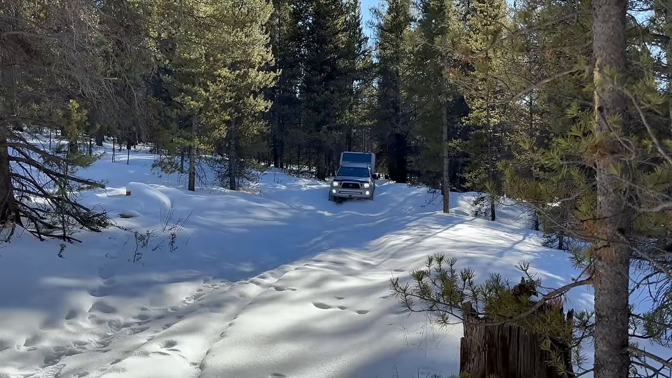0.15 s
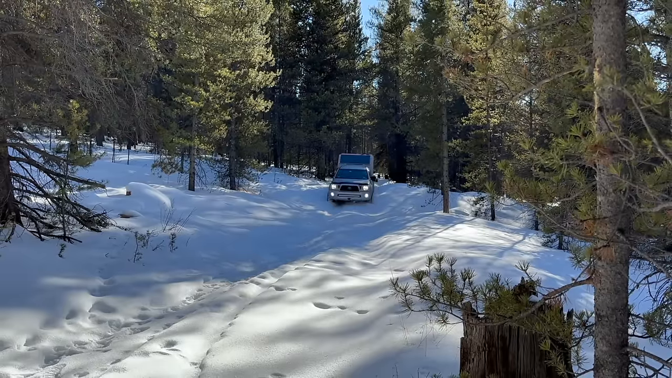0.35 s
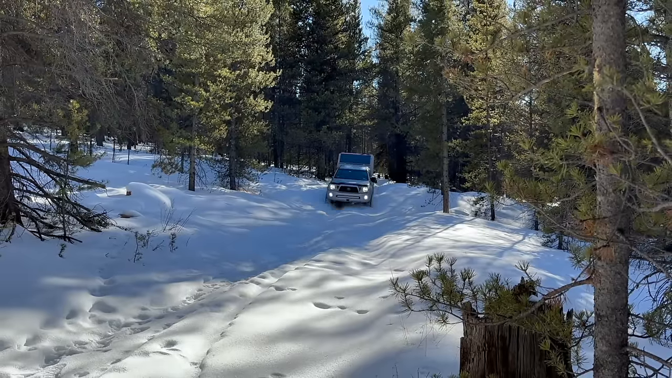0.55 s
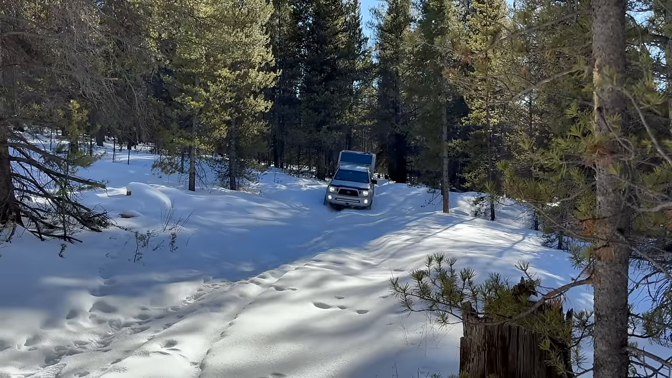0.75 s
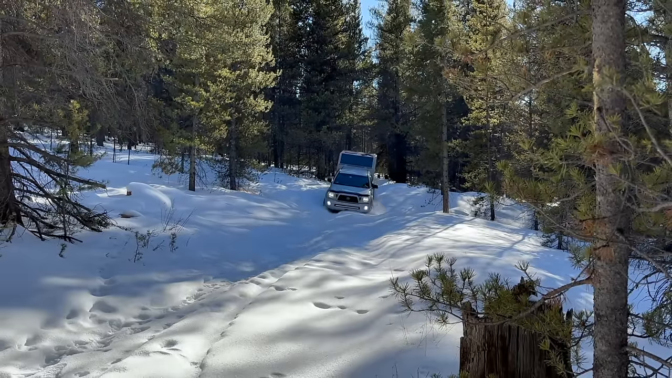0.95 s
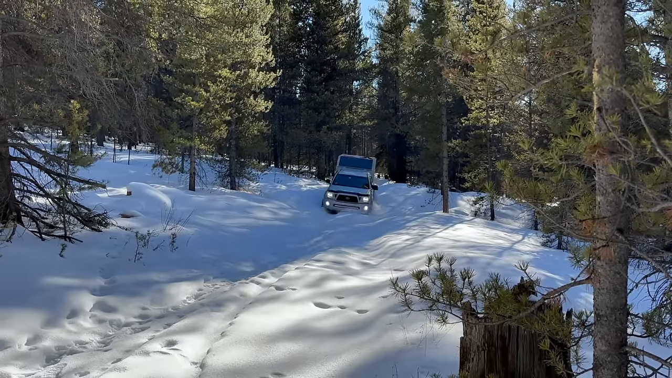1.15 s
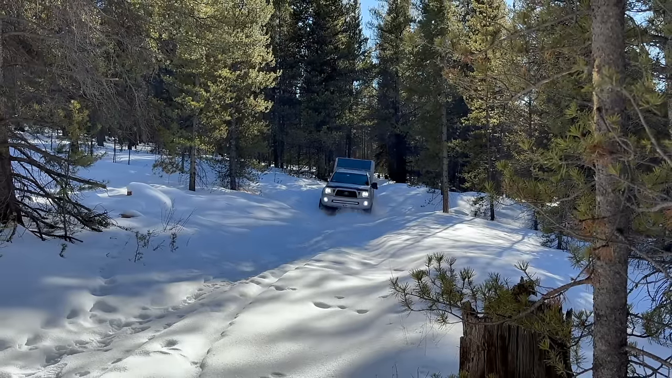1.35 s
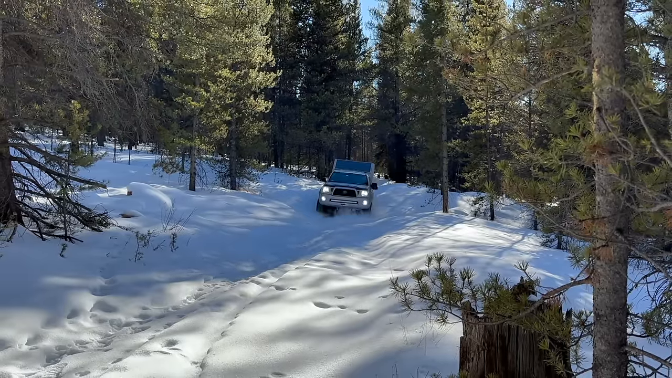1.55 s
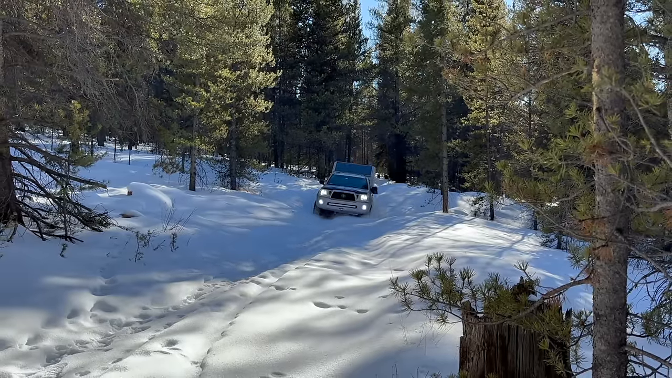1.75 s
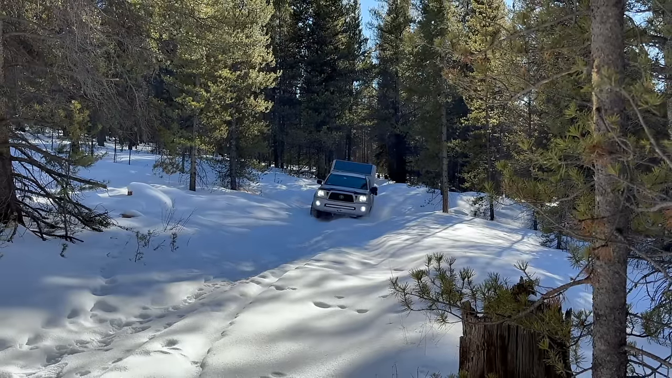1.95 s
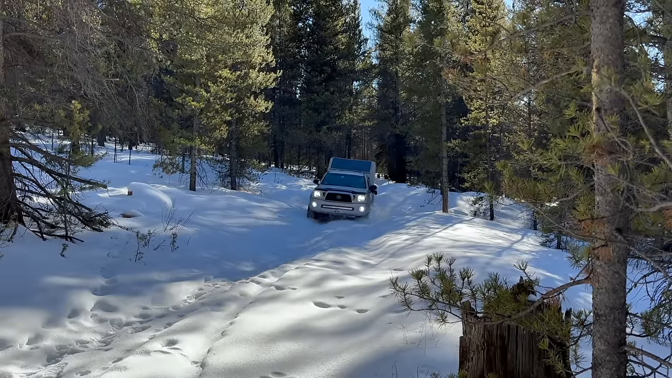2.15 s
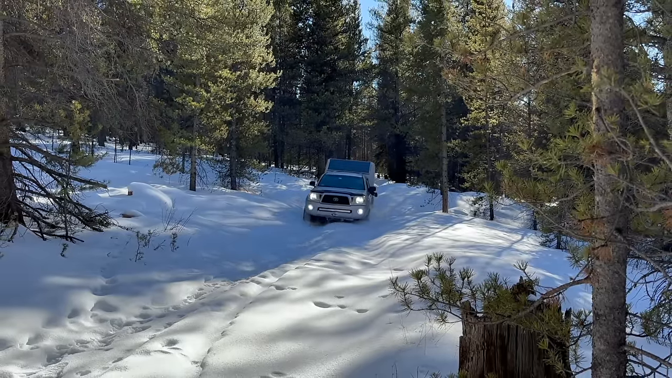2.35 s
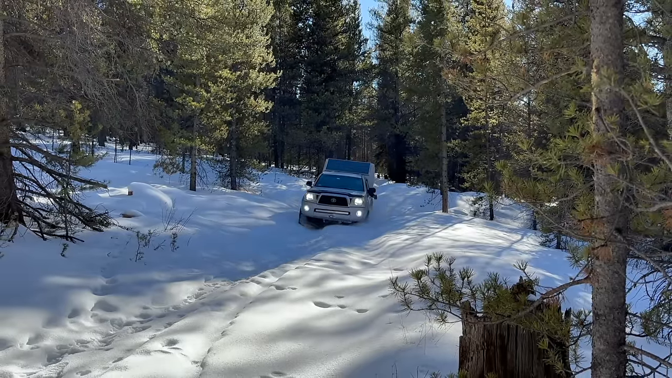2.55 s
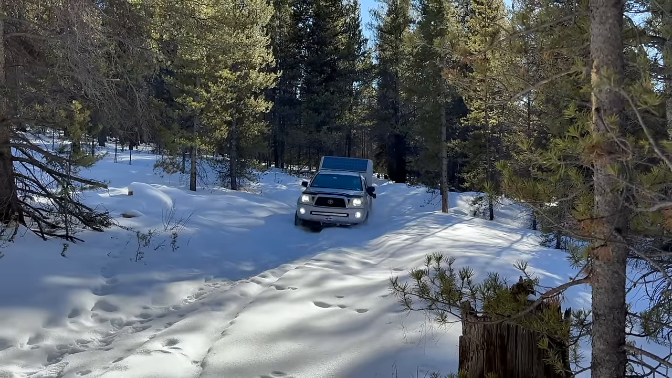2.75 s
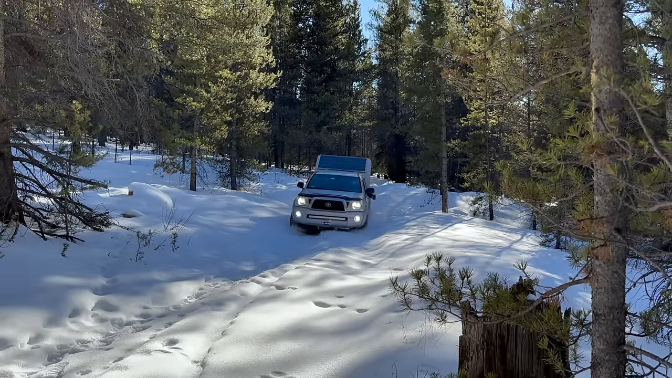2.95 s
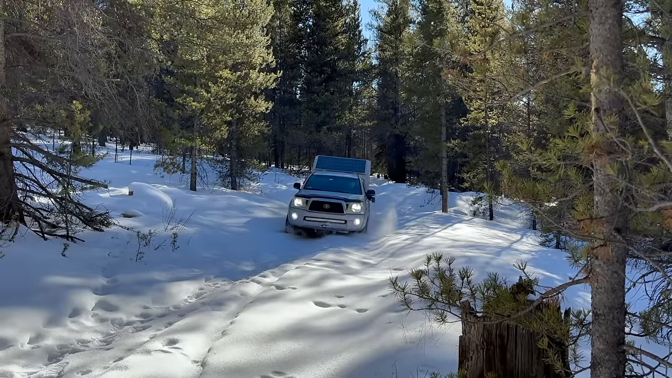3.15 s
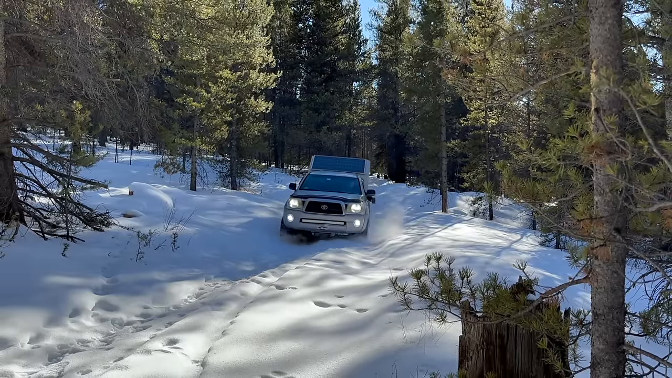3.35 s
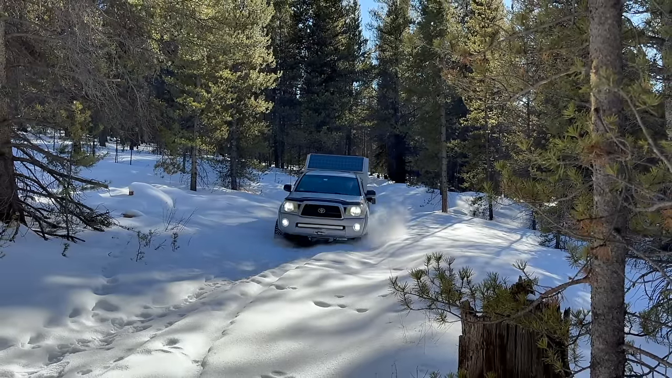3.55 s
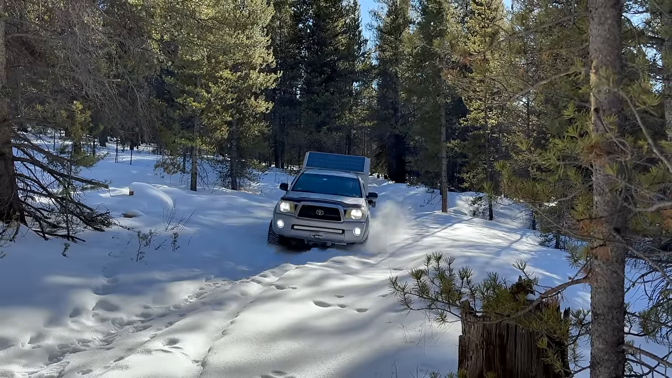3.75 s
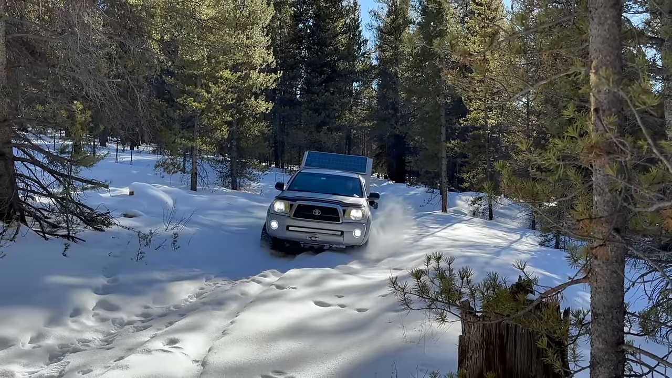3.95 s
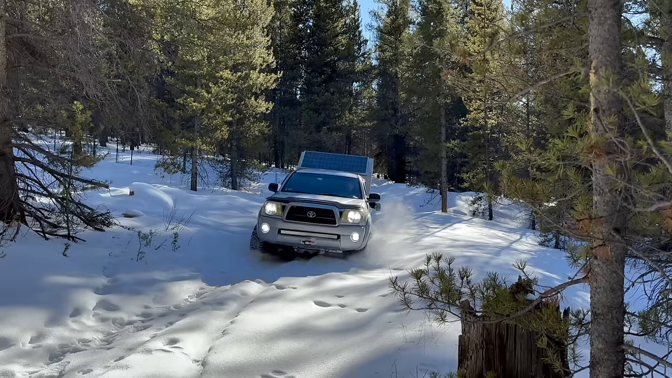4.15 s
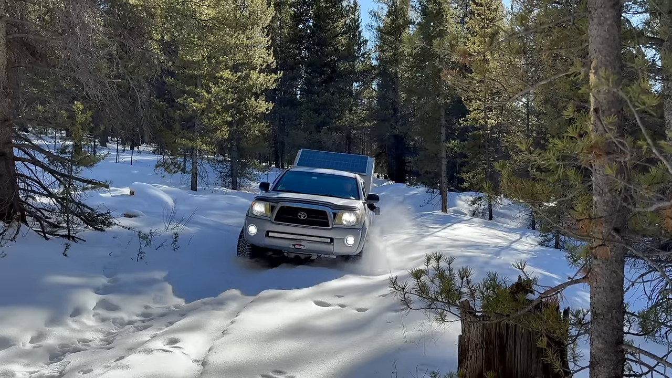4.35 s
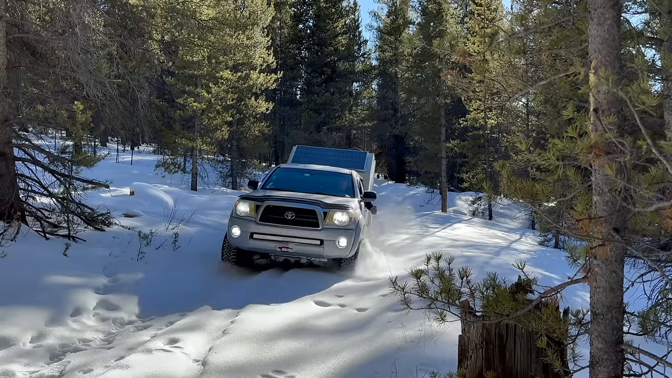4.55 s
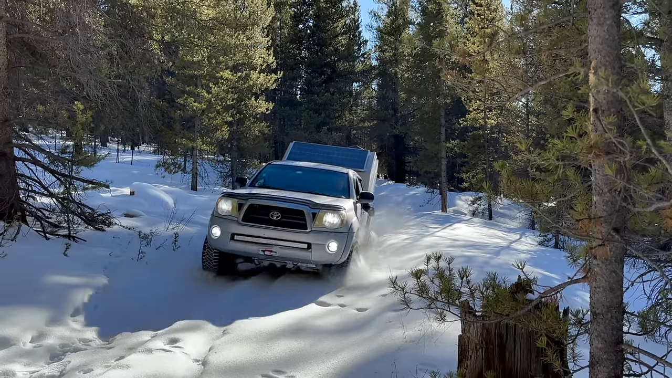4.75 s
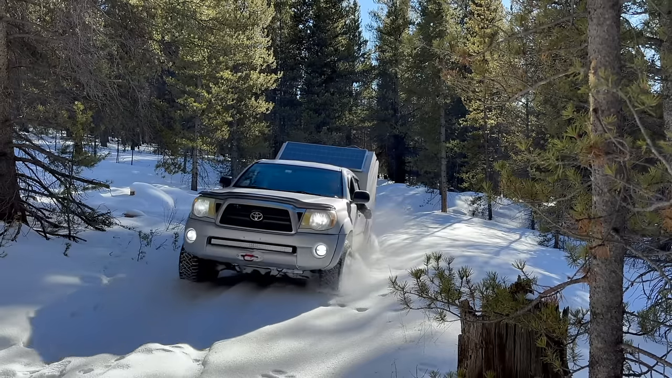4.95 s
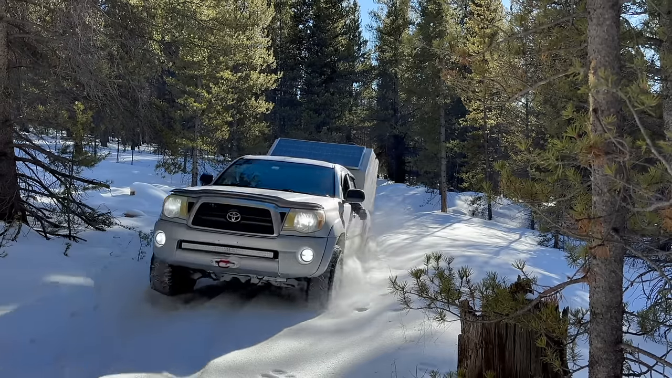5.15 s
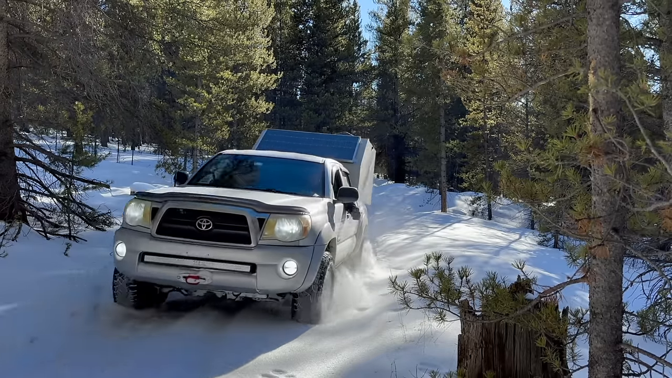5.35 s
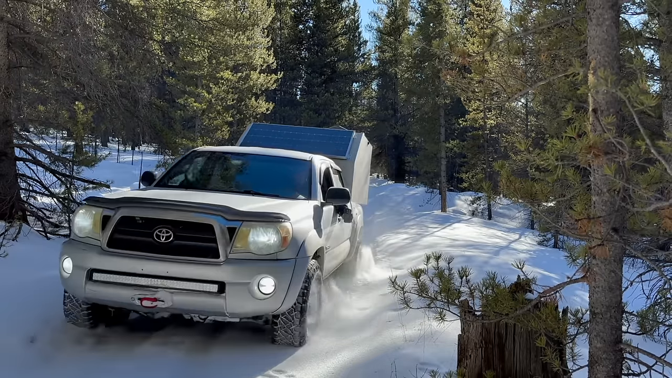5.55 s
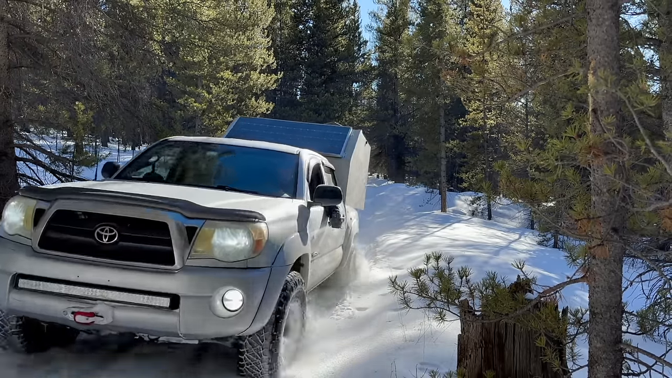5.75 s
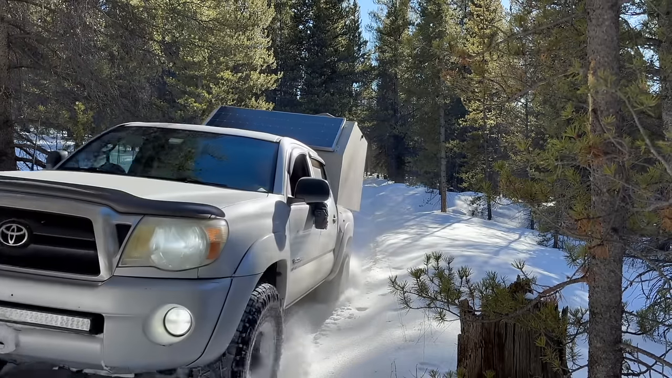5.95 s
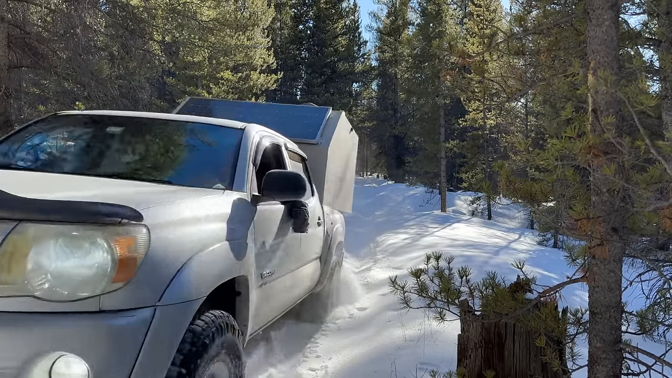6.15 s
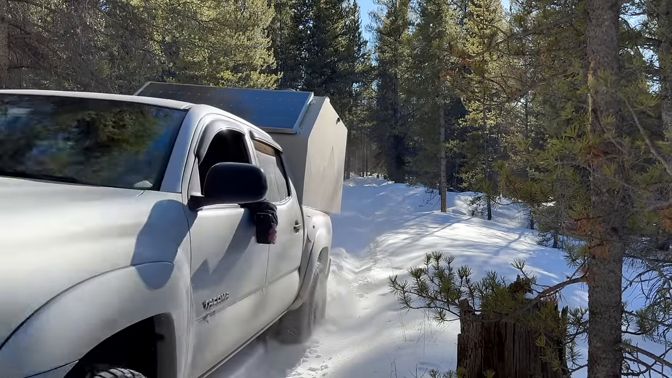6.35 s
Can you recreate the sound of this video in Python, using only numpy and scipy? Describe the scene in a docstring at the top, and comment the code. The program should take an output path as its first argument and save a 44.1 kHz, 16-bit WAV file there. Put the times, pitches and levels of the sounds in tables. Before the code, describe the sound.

Outdoors in a snowy forest, a six-cylinder pickup revs hard in the distance, growl and rushing fan air rising to a peak around one second. The revs drop and steady, ease briefly, then a deeper exhaust drone grows as it nears. Tyres rumble and crunch; snow hisses loudest as it draws level on the left. A fixed stereo microphone stands beside the trail.

```python
"""Pickup climbing a snowy trail

A six-cylinder pickup climbs a forest trail toward the listener and draws level on the left.
Crank-order partials make its growl and exhaust drone; filtered noise makes the rush of fan and intake air.
Banded noise rumbles and packs under the tyres; random snaps crunch and hiss as broken and thrown snow.
The growl and fan lead while it revs far off; closer in, the drone takes over."""
import sys
import numpy as np
from scipy import signal
from scipy.fft import rfft, irfft, next_fast_len
from scipy.io import wavfile

SR = 44100
rng = np.random.default_rng(int(sys.argv[2]) if len(sys.argv) > 2 else 0)


def put_to_file(sound):
    """Save the sound as 16-bit audio at rate SR, in the file named by the first command-line argument."""
    columns = np.atleast_2d(sound).T  # one column per channel
    safe = np.clip(columns, -1, 1)
    whole_steps = np.round(safe * 32767)
    wavfile.write(sys.argv[1], SR, whole_steps.astype(np.int16))


N = 286650
TIME = np.arange(N) / SR

# the truck drives a straight line at a steady pace; each part draws level at: (time [s], distance [m])
TRUCK_M_PER_S = 4.57
ENGINE_PASS, WHEEL_PASS = (6.06, 5.3), (6.384, 3)


def from_db(db):
    """Decibels to gain."""
    return 10 ** (np.asarray(db) / 20)


def rms_one(x):
    """Scale to unit power."""
    return x / np.sqrt(np.mean(x ** 2) + 1e-20)


def in_time(curve):
    """Read a curve of (time, value) points sample by sample."""
    s, value = np.transpose(curve)
    return np.interp(TIME, s, value)


def at_hz(points, hz):
    """Read a spectrum on a log-frequency axis."""
    f, value = np.transpose(points)
    return np.interp(np.log(hz), np.log(f), value)


def drift(rate_hz):
    """Slow random wander of spread 1: low-passed noise drawn at every 40th sample."""
    step = 40
    r = np.exp(-2 * np.pi * rate_hz * step / SR)
    noise = rng.standard_normal(N // step + 2002)
    slow = signal.lfilter([1], [1, -2 * r, r * r], noise)[2000:]  # drop the filter's start-up
    return np.interp(np.arange(N) / step, np.arange(len(slow)), rms_one(slow))


def white():
    """Three independent streams of steady noise."""
    return rng.standard_normal((3, N))


def grains(per_s, spread_db):
    """Three independent streams of tiny random snaps of uneven size."""
    sizes = from_db(spread_db * np.minimum(rng.exponential(1, (3, N)), 4))
    struck = rng.random((3, N)) < per_s / SR
    return rms_one(sizes * rng.standard_normal((3, N)) * struck)


def coloured(spectrum, flicker_db, source=white):
    """Third-octave bands of a shared stream plus one stream per ear, each band flickering; rms 1."""
    # how alike left and right are: (frequency [Hz], shared part of the power [0-1])
    likeness = [(60, .99), (290, .98), (640, .92), (1400, .85), (2200, .87), (3500, .65), (4800, .62),
                (5800, .35), (7000, .72), (10000, .86), (12000, .88), (15000, .8)]
    out = 0
    draws = (source(), source())  # neighbouring bands take turns
    edges = 20 * 2 ** (np.arange(30) / 3) * 1.02
    for k, (low, high) in enumerate(zip(edges, edges[1:])):
        if high < spectrum[0][0] or low > spectrum[-1][0]:
            continue
        hz = np.sqrt(low * high)
        alike = np.clip(at_hz(likeness, hz), 0, 1)
        shared, own = draws[k % 2][0], draws[k % 2][1:]
        ears = np.sqrt(alike) * shared + np.sqrt(1 - alike) * own
        band_pass = signal.butter(2, [low, high], "band", fs=SR, output="sos")
        band = signal.sosfilt(band_pass, ears + 1e-18)
        out = out + band * from_db(at_hz(spectrum, hz) + flicker_db * drift(9.5))
    return rms_one(out)


def whistle(hz, width_hz):
    """Noise sent twice through one resonance, which it sings in; rms 1."""
    r = np.exp(-np.pi * width_hz / SR)
    poles = [1, -2 * r * np.cos(2 * np.pi * hz / SR), r * r]
    once = signal.lfilter([1, 0, -1], poles, rng.standard_normal(N))
    return rms_one(signal.lfilter([1, 0, -1], poles, once))


def partial(angle, order, rough, scatter=np.pi):
    """One engine order shaken by uneven combustion; small phase scatter [rad] lines orders into a pulse."""
    height = 1 + rough * drift(22)
    wobble = rough * drift(22)
    phase = scatter * rng.uniform(-1, 1)
    return np.sqrt(2) * height * np.sin(order * angle + phase + wobble)


def swells(rows):
    """Gain of events that each rise to a peak and die away exponentially."""
    total = 0
    for s, db, rise, fall in rows:
        total = total + from_db(db) * np.exp(-np.maximum((s - TIME) / rise, (TIME - s) / fall))
    return total


def distance(passing):
    """Metres from the listener to a part of the truck."""
    s, miss_m = passing
    return np.hypot(miss_m, TRUCK_M_PER_S * (TIME - s))


def level(cruise_db, per_near, per_drive, passing, drive_db):
    """Gain from the level cruising 10 m away, plus dB per dB of nearness and per dB of drive."""
    near_db = 20 * np.log10(10 / distance(passing))
    return from_db(cruise_db + per_near * near_db + per_drive * drive_db)


def engine_level(cruise_db, per_near, per_effort, passing=ENGINE_PASS):
    """Engine sounds follow how hard the engine works."""
    # effort above cruising: (time [s], level [dB])
    effort = [(0, 7), (.7, 8), (.9, 8), (1.65, 7), (2.099, 4), (2.35, 3.5), (2.65, 1), (3.7, -2.5),
              (4.3, -8), (4.9, -1), (5.351, 1), (6.15, 3.5), (6.5, -6.5)]
    return level(cruise_db, per_near, per_effort, passing, in_time(effort))


def tyre_level(cruise_db, per_near, per_slip):
    """Tyre sounds follow how much the wheels slip."""
    # wheelspin above cruising: (time [s], level [dB])
    wheelspin = [(0, 7.5), (.78, 7), (.96, 10), (1.6, 8.5), (2.5, 2.5), (3.4, -1.5), (4.35, -6.5), (5, -4),
                 (5.45, -3.5), (5.82, 1), (6.5, 3)]
    return level(cruise_db, per_near, per_slip, WHEEL_PASS, in_time(wheelspin))


def panned(x, right_db):
    """A steady level difference between the sides."""
    return x * from_db(right_db / 2 * np.array([[-1], [1]]))


def placed(x, share):
    """The wheels move left as they draw level: louder there by a share of the pan, and earlier."""
    ahead_db, alongside_db, lead_ms = 3, 6.5, 0.19  # left-right dB, extra dB alongside, left lead alongside
    sideways = WHEEL_PASS[1] / distance(WHEEL_PASS)
    pan_db = ahead_db + alongside_db * sideways
    right = np.interp(TIME - lead_ms * sideways / 1000, TIME, x[1])
    return np.array([x[0], right]) * from_db(share * pan_db / 2 * np.array([[1], [-1]]))


def exhaust(angle, speed):
    """One tailpipe thump per crank turn; orders 3 to 6 come out as the truck's side opens to view."""
    # the tailpipe's boom, second crank order: (time [s], level [dB])
    boom_curve = [(0, -38), (.4, -45.5), (.68, -37.5), (1.0, -53), (1.65, -46), (2.1, -32), (3.2, -32.5),
                  (4.35, -37), (4.87, -27), (5.3, -29), (6.13, -25.5), (6.35, -32)]
    # the fourth order sweeps through a null of the pipe: (frequency [Hz], level [dB])
    pipe_null = [(165, 3.5), (180, 1.5), (197, -14), (215, 4), (240, 20)]
    chug = engine_level(-49.5, per_near=-0.39, per_effort=0.4)
    boom = from_db(in_time(boom_curve))
    firing = engine_level(-39, per_near=1.99, per_effort=0.087)
    fourth = engine_level(-51.5, per_near=1.79, per_effort=-0.059, passing=WHEEL_PASS)
    fourth = fourth * from_db(at_hz(pipe_null, 4 * speed))
    fifth = engine_level(-60.5, per_near=1.9, per_effort=0.12, passing=WHEEL_PASS)
    sixth = firing * from_db(-15.5)
    drone = 0
    for order, gain in enumerate((chug, boom, firing, fourth, fifth, sixth), start=1):
        drone = drone + gain * partial(angle, order, rough=.06, scatter=1.4)
    return drone


def growl(angle, speed):
    """Many loosely phased crank orders, shaped by resonances; unequal cylinders add weak half orders."""
    # strong and weak crank orders: (order, level [dB])
    order_levels = [(5, -1), (6, -2.5), (7, 4), (8, .5), (9, 1), (10, 0), (11, -1), (12, -1)]
    # resonances that shape the growl: (frequency [Hz], level [dB])
    resonances = [(225, -12), (262, -1.5), (310, 1), (365, -3), (435, -.5), (520, -3.5), (720, -8),
                  (900, -16), (1400, -22), (2000, -25)]
    voice = 0
    for k in range(5, 33):
        db = np.interp(k, *np.transpose(order_levels)) + at_hz(resonances, k * speed)
        voice = voice + from_db(db) * partial(angle, k, rough=.01 * k, scatter=2.7)
    for k in np.arange(4.5, 14):
        voice = voice + from_db(at_hz(resonances, k * speed) - 16) * partial(angle, k, rough=.4)
    cruise_turns_per_s, db_per_octave = 45, 6  # the growl gets louder with the revs
    rev_gain = from_db(db_per_octave * np.log2(speed / cruise_turns_per_s))
    return engine_level(-45.3, per_near=.15, per_effort=.9) * rev_gain * rms_one(voice)


def fan(angle):
    """Rushing air as noise that throbs with the crank and with each firing."""
    # rush of air: (frequency [Hz], level [dB per Hz])
    rush = [(150, -33), (250, 9.5), (450, 9.5), (700, 7.5), (1000, 3), (1450, -1), (1950, 2), (2600, -10),
            (3300, -6.5), (4500, -19), (6000, -21), (9000, -23)]
    throb_db = 0.46
    beat = np.cos(angle) + .4 * np.cos(angle / 2) + .5 * np.cos(angle * 2) + .4 * np.cos(angle * 3)
    air = coloured(rush, flicker_db=0.33) * from_db(throb_db * beat)
    return engine_level(-48.5, per_near=-0.13, per_effort=1.104) * air


def whine():
    """A thin unsteady tone that comes up while the revs are held and as they fall."""
    # moments it comes up: (time [s], level [dB], rise [s], fall [s])
    whine_swells = [(1.58, -47, 0.15, 0.34), (1.92, -55, .04, .06), (2.37, -57, 0.055, .06)]
    gain = np.hypot(engine_level(-68.5, per_near=-0.61, per_effort=0.63), swells(whine_swells))
    hz = 1056
    angle = 2 * np.pi * hz * TIME + 1.1 * drift(10)
    return gain * partial(angle, 1, rough=.5)


def intake():
    """Resonant intake air gulps at the top of the rev, with a narrow whirr over it."""
    # the gulp: (time [s], level [dB], rise [s], fall [s])
    gulp_swell = [(1.03, -53.5, 0.21, 0.42)]
    gulp = swells(gulp_swell)
    breath_gain = np.hypot(engine_level(-58.5, per_near=0.19, per_effort=0.061), gulp)
    breath = breath_gain * whistle(hz=2450, width_hz=1260)
    whirr = gulp * from_db(3.5) * whistle(hz=2590, width_hz=330)
    return breath + whirr


def engine():
    """One turning crank drives drone, growl and fan throb; whine and intake air join them."""
    # engine speed: (time [s], crank speed [turns per s])
    speed_curve = [(0.0, 46.8), (0.31, 51.3), (0.61, 49.3), (0.7, 49.8), (0.89, 59.7), (1.0, 63.9),
                   (1.07, 63.9), (1.27, 60.1), (1.68, 62.4), (2.19, 49.6), (2.32, 50.8), (2.59, 44.4),
                   (2.73, 43.9), (3.02, 45.0), (3.58, 44.5), (3.87, 44.0), (4.31, 40.5), (4.54, 44.6),
                   (4.89, 48.8), (5.27, 44.6), (5.54, 46.2), (5.74, 45.2), (6.15, 45.7), (6.5, 39.5)]
    speed = in_time(speed_curve)
    angle = 2 * np.pi * np.cumsum(speed) / SR
    tones = exhaust(angle, speed) + growl(angle, speed) + whine()
    return panned(tones, right_db=-1.1) + panned(fan(angle), right_db=.3) + panned(intake(), right_db=2.5)


def rumble():
    """Deep noise under the rolling wheels, with low swells that rise and fade."""
    # deep rumble: (frequency [Hz], level [dB per Hz])
    deep = [(22, -41), (35, -28), (48, -2.5), (70, 1), (95, -4.5), (125, -13.5), (180, -51), (300, -68)]
    # moments when the deep rumble rises and fades: (time [s], level [dB], rise [s], fall [s])
    low_swells = [(1.9, -38, 0.092, 0.27), (3.47, -38, .06, 0.23), (3.78, -41, 0.061, .08),
                  (6.35, -35, .08, .12)]
    gain = np.hypot(tyre_level(-43.5, per_near=0.5, per_slip=0.32), swells(low_swells))
    return gain * coloured(deep, flicker_db=3.0)


def packing():
    """Snow pressed together under the tread, a dull steady noise."""
    # packed snow: (frequency [Hz], level [dB per Hz])
    pack = [(80, 2), (140, 2.5), (220, -9), (330, -6), (500, -18), (900, -18), (2000, -52)]
    return tyre_level(-48, per_near=1.59, per_slip=0.22) * coloured(pack, flicker_db=0.5)


def crunch():
    """Snow grains snap under the tyres at random."""
    # crunching grains: (frequency [Hz], level [dB per Hz])
    crunch_spectrum = [(150, -47), (250, -3.5), (350, -3.5), (520, 1), (700, -9), (1000, -14), (1500, -22),
                       (2500, -22), (5000, -34)]
    snaps = coloured(crunch_spectrum, flicker_db=2.0, source=lambda: grains(per_s=4000, spread_db=2.0))
    return tyre_level(-46.5, per_near=.35, per_slip=0.15) * snaps


def crust():
    """Crust breaks under the nearest front tyre in a swell of more uneven snaps."""
    # crackling crust: (frequency [Hz], level [dB per Hz])
    crackle = [(450, 5.5), (750, 2), (1050, 5), (1500, -1.5), (2100, -11), (3200, -29), (5000, -25)]
    # the break: (time [s], level [dB], rise [s], fall [s])
    crust_break = [(6.29, -36.5, 0.33, 0.24)]
    snaps = coloured(crackle, flicker_db=2.0, source=lambda: grains(per_s=4000, spread_db=4.0))
    return swells(crust_break) * snaps


def tyres():
    """Wheels rumble, pack the snow, crunch its grains and break its crust."""
    return panned(rumble(), right_db=-3.0) + placed(packing(), share=0.88) + placed(crunch() + crust(), share=0.68)


def swish():
    """Coarse snow grains sweep along the truck's side as dense random snaps."""
    # coarse grains: (frequency [Hz], level [dB per Hz])
    swish_spectrum = [(1500, 3), (2500, 5.5), (3300, 4.5), (4200, 1.5), (5200, 2.5), (6000, 1.5),
                      (7200, -3.5), (8500, 8.5), (11000, -20)]
    # sheets of snow: (time [s], level [dB], rise [s], fall [s])
    sweeps = [(1.58, -54, 0.12, 0.52), (3.1, -59.5, 0.25, 0.54), (6.38, -47.5, .13, 0.38)]
    snow = coloured(swish_spectrum, flicker_db=3.5, source=lambda: grains(per_s=16000, spread_db=3.5))
    return snow * np.hypot(tyre_level(-59.5, per_near=1.26, per_slip=0.73), swells(sweeps))


def powder():
    """Fine powder hisses all round as still denser snaps."""
    # fine spray: (frequency [Hz], level [dB per Hz])
    spray = [(4500, 1), (6000, -5.5), (7000, 0), (8500, 5.5), (10000, -0.5), (12000, 0.5), (14000, -1),
             (16000, 0)]
    # fans of powder flung off the wheels: (time [s], level [dB], rise [s], fall [s])
    flings = [(3.05, -53, 0.012, 0.19), (3.9, -58, .015, 0.17), (5.3, -50, .015, 0.11),
              (5.54, -52, .01, 0.06), (6.26, -41.5, .03, .13)]
    hiss = coloured(spray, flicker_db=0.54, source=lambda: grains(per_s=32000, spread_db=3.5))
    return hiss * np.hypot(tyre_level(-54, per_near=0.97, per_slip=0.95), swells(flings))


def thrown_snow():
    """Swish beside the truck and powder all round share the same uneven bursts."""
    bursts = from_db(.35 * drift(15))
    return (placed(swish(), share=0.97) + powder()) * bursts


def scene():
    """Engine, tyres and thrown snow travel together up the trail."""
    return engine() + tyres() + thrown_snow()


def record(dry):
    """The microphone ports colour the treble and shift its phase between the sides; the top is cut steeply."""
    # the pair of ports: (frequency [Hz], gain [dB], left lead [rad])
    ports = [(20, 0, 0), (2200, 0, 0), (3200, 0, .7), (5800, 0, .4), (7100, 0, 1.2), (7900, -1.5, 2.6),
             (8500, -1.5, 2.5), (9300, 1, 1.4), (10300, 2.5, .7), (11800, -1.2, 0), (13500, 0, -.7),
             (15700, 1.5, -2.0)]
    cutoff_hz = 15800
    hz, port_db, lead = np.transpose(ports)
    size = next_fast_len(N + SR // 10)
    bins = np.arange(size // 2 + 1) * SR / size
    gain = from_db(np.interp(bins, hz, port_db))
    turn = np.exp(.5j * np.interp(bins, hz, lead) * np.array([[1], [-1]]))  # half the lead on each side
    ported = irfft(rfft(dry, size) * gain * turn, size)[:, :N]
    return signal.sosfilt(signal.ellip(12, .2, 80, cutoff_hz, fs=SR, output="sos"), ported)


dry = scene()
out = record(dry)
put_to_file(out)
```